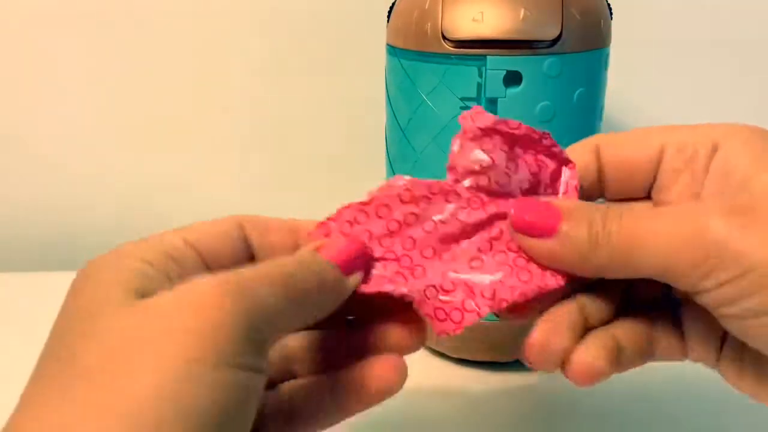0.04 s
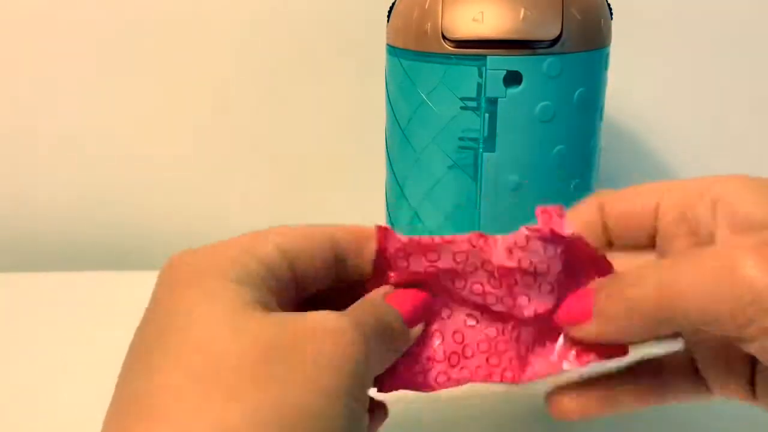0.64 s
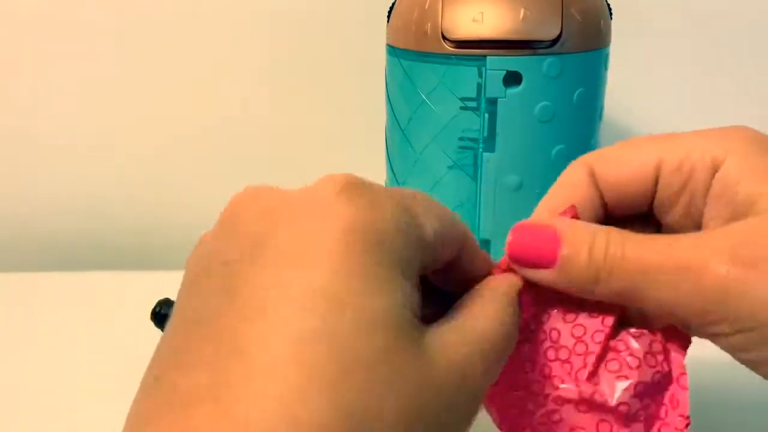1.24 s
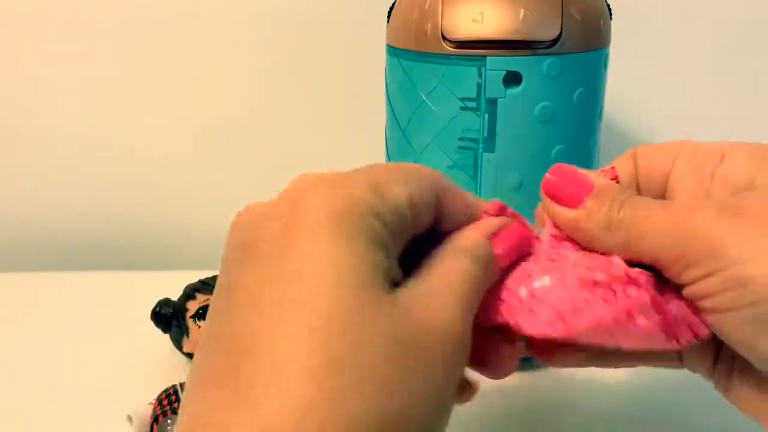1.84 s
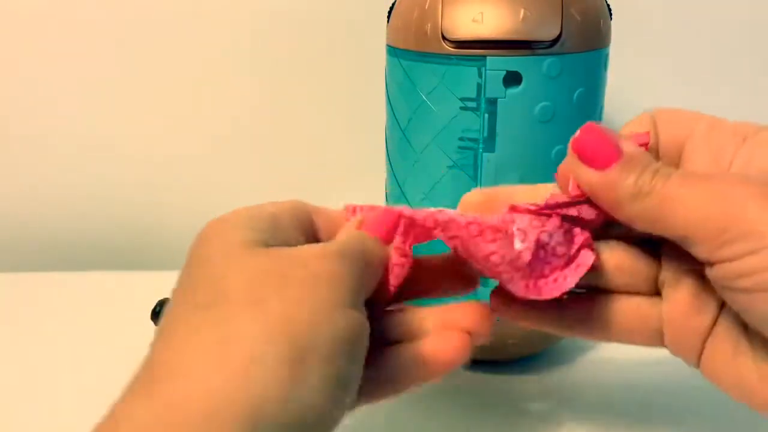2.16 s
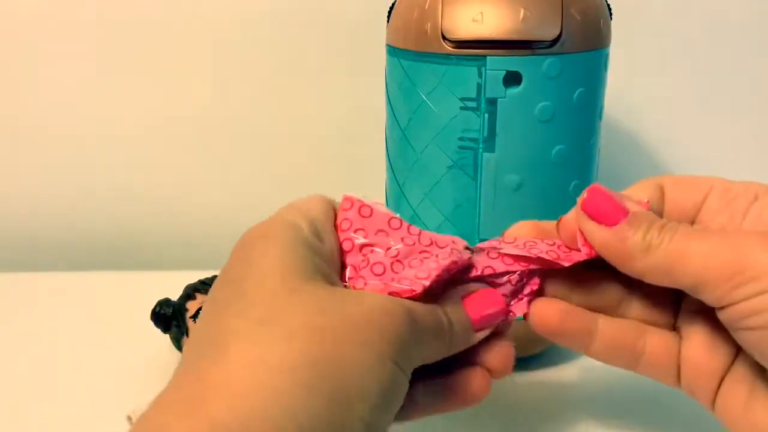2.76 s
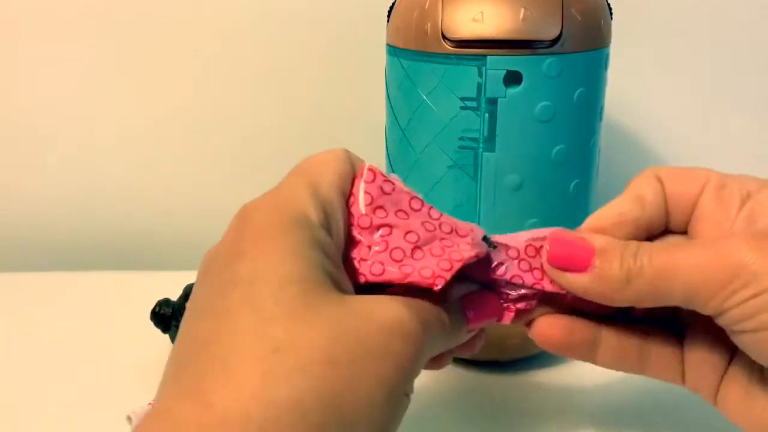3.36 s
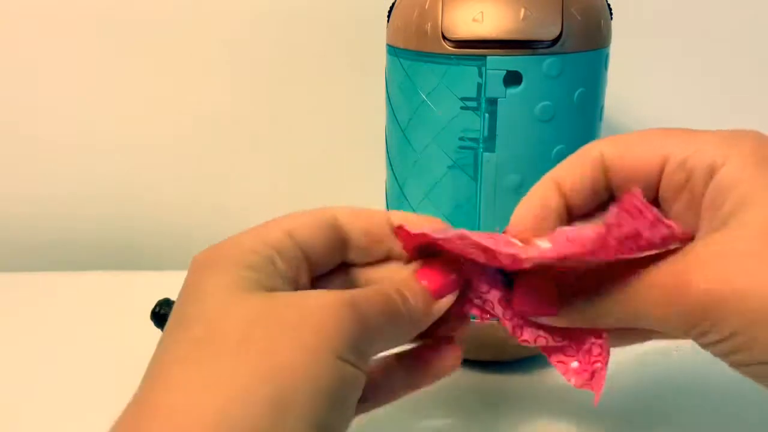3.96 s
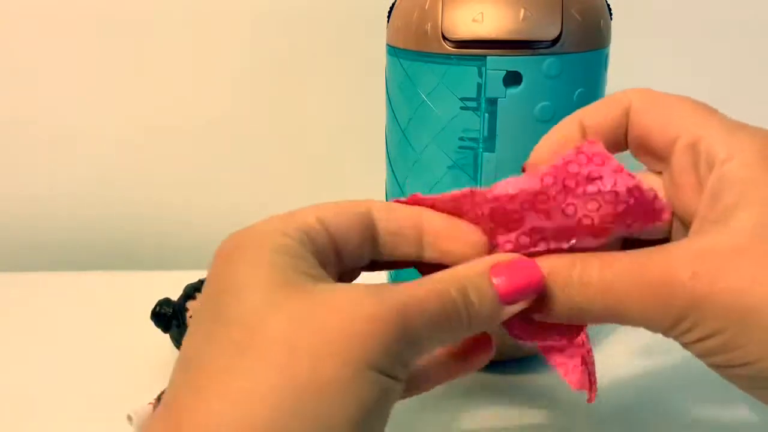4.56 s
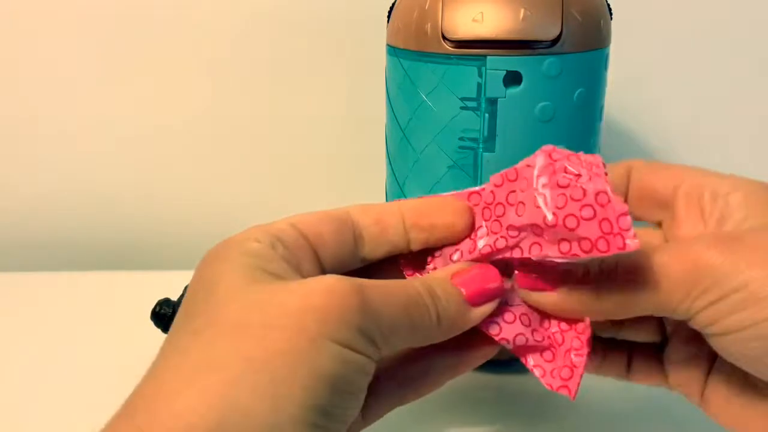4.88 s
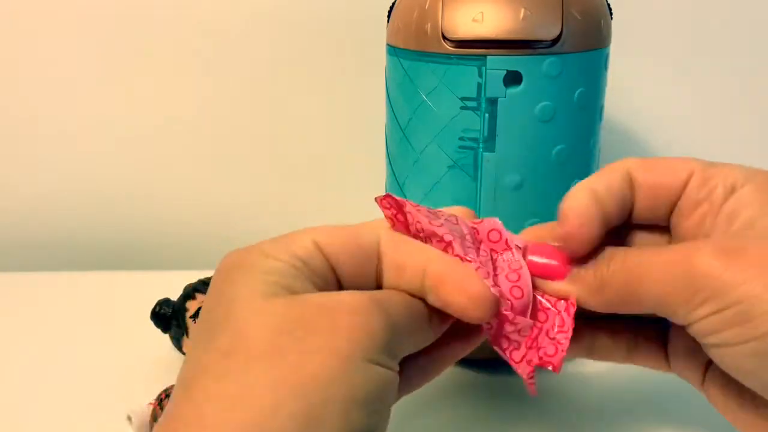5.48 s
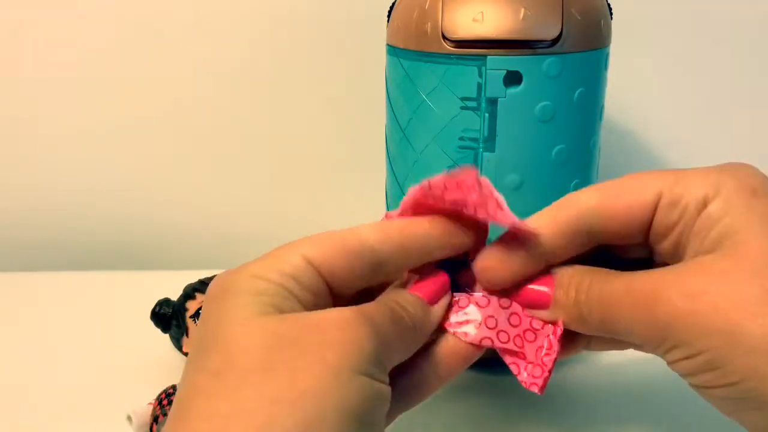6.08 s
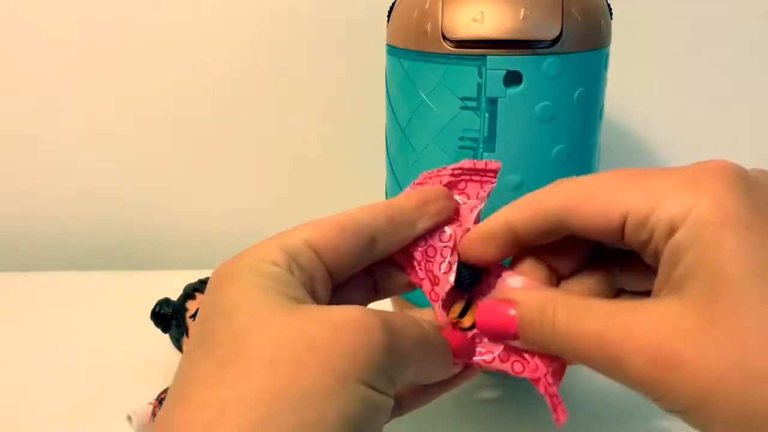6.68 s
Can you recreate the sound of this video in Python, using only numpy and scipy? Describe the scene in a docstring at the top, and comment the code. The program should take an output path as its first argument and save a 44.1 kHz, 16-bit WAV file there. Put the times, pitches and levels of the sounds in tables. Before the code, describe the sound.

Thin plastic crinkles from start to finish as fingers squeeze and tug at a wrapper. Each pull brings a swell of fine crackle and sizzle, dotted with crisp snaps and the occasional papery tap. Skin scuffs the plastic faintly, and a fingertip lands with a soft thump about two thirds of the way through. The sound is close and in stereo, in a small room with a faint low rumble and electrical hum.

```python
"""In a small room, close to a stereo recorder on a table, two hands pull open a crinkly plastic wrapper.
Countless tiny creases crackle under the fingers, film sizzles as it slides on film, and skin scuffs it.
Large creases snap through one by one, and whole panels buckle with a papery tap.
The hands bump softly, a fingertip knocks once, and a faint mains hum and room rumble lie underneath."""
import sys
import numpy as np
from scipy import signal
from scipy.fft import rfft, irfft, next_fast_len
from scipy.io import wavfile
from scipy.ndimage import uniform_filter1d

SR = 44100
rng = np.random.default_rng(int(sys.argv[2]) if len(sys.argv) > 2 else 0)


def inscribe(sig):
    """Save sig as 16-bit PCM at rate SR to the path in sys.argv[1].

    A 1-D sig is mono; a 2-D sig holds one channel per row.
    Samples are clipped to [-1, 1] before scaling.
    """
    pcm = np.round(np.clip(np.atleast_2d(sig).T, -1, 1) * 32767)
    wavfile.write(sys.argv[1], SR, pcm.astype(np.int16))


N = 296799
TIME = np.arange(N) / SR
TOP_HZ = 15800  # the treble is cut above this

# The tone of the room's rumble. Each row: frequency in Hz, relative level in dB.
RUMBLE_TONE = [(30, -13), (55, 3), (80, -11), (160, -10.5), (450, -13), (700, -19.5), (2000, -15),
               (15000, -79)]
# Squeezes and pulls of the fingers. Each row: moment of most strain in seconds, build-up in seconds,
# letting go in seconds, relative level in dB, dullness in dB (higher sounds duller).
SQUEEZES = [(0.03, 0.065, 0.11, -19, -15.5), (0.181, 0.078, 0.057, -28.5, -5.5),
            (0.321, 0.073, 0.079, -39, -4), (.455, 0.037, 0.054, -37, -4),
            (0.563, 0.065, 0.0074, -23.5, -8), (.687, 0.11, 0.013, -30.5, -15.5),
            (.823, 0.11, 0.03, -23.5, -9.5), (.991, 0.022, 0.013, -34, -3), (1.07, 0.03, 0.01, -31.5, -8),
            (1.249, 0.055, 0.013, -36.5, 3), (1.382, 0.022, 0.013, -39, -1.5),
            (1.5, 0.015, 0.029, -34.5, -12), (1.734, 0.036, 0.071, -25, -9),
            (1.877, 0.016, 0.11, -28.5, -2.5), (2.147, 0.12, 0.047, -23.5, -9),
            (2.355, 0.14, 0.045, -26.5, -16), (2.463, 0.12, 0.016, -30, -13.5),
            (2.541, 0.016, 0.025, -33.5, -9), (2.644, 0.035, 0.072, -21.5, -10),
            (2.84, 0.15, 0.19, -24, -15.5), (3.089, 0.022, 0.019, -24.5, -8.5),
            (3.315, 0.1, 0.064, -24, -13), (3.49, 0.14, 0.064, -20.5, -17.5),
            (3.63, 0.13, 0.19, -29, -11.5), (3.949, 0.11, 0.035, -32, -12.5),
            (4.041, 0.047, 0.032, -24, -16), (4.14, 0.023, 0.063, -30, -23),
            (4.244, 0.091, 0.13, -30.5, -13), (4.439, 0.0583, 0.028, -36, -7.5),
            (4.513, 0.032, 0.05, -23.5, -7), (4.635, 0.055, 0.087, -24.5, -9.5),
            (4.98, 0.2, 0.16, -23.5, -17), (5.18, 0.064, 0.083, -24.3, -13.5),
            (5.26, 0.05, 0.087, -25, -7.5), (5.42, 0.042, 0.05, -38, -10), (5.489, 0.077, 0.11, -38, 0),
            (5.766, 0.15, 0.053, -30.5, -7.5), (5.95, 0.066, 0.07, -39.5, -10),
            (6.088, 0.035, 0.094, -25, -9.5), (6.293, 0.12, 0.053, -24, -8),
            (6.459, 0.14, 0.04, -29.5, -6.5), (6.628, 0.062, 0.2, -39, -10)]
# The tone of the plastic film. Each row: frequency in Hz, relative level in dB.
FILM_TONE = [(100, -40.5), (280, -30), (500, -16.5), (700, -18.5), (950, -12.5), (1300, -7), (1800, -12.5),
             (2100, -1), (2700, -4), (3500, -2), (5000, -3), (8000, -2.5), (10000, 0.5), (15000, 0)]
# Fingertips rubbing the film. Each row: start in seconds, end in seconds, level in dB.
RUBS = [(.02, 0.205, -53), (0.734, 0.88, -47), (4.392, 4.943, -55), (5.397, 5.64, -53.5)]
# Large creases snapping through. Each row: time in seconds, relative level in dB, dullness in dB.
SNAPS = [(0.0619, -14.0, -27), (0.2104, -22.0, 0), (0.3112, -19.5, -12), (0.346, -23.5, -17),
         (0.4372, -18.5, -9), (0.4595, -19.0, -12), (0.5121, -19.0, -8), (0.5612, -18.0, -21),
         (0.5686, -14.0, -13), (0.5961, -19.5, -20), (0.6083, -24.0, -15), (0.6758, -18.5, -15),
         (0.6808, -17.0, -21), (0.6875, -16.0, -13), (0.7081, -15.5, -24), (0.746, -21.0, -10),
         (0.7538, -17.0, -10), (0.7951, -15.5, -24), (0.8092, -15.5, 4), (0.8527, -16.0, -8),
         (0.8612, -17.0, -13), (0.9241, -24.5, -8), (0.9293, -19.0, -5), (0.9619, -17.0, -5),
         (0.9853, -22.5, -7), (1.0407, -19.5, -20), (1.0987, -23.5, -3), (1.1439, -26.5, -3),
         (1.1834, -17.0, -3), (1.1862, -14.5, -9), (1.235, -25.5, 8), (1.2485, -19.5, -3),
         (1.2906, -23.0, 8), (1.3101, -26.5, -10), (1.3288, -19.5, -2), (1.356, -26.0, -13),
         (1.4161, -14.0, -17), (1.4483, -24.0, 8), (1.5013, -22.5, -9), (1.5638, -23.0, -23),
         (1.591, -22.0, -19), (1.6705, -22.5, -12), (1.6797, -26.0, -15), (1.6971, -17.5, -1),
         (1.7101, -16.0, -19), (1.7195, -14.0, -26), (1.7226, -16.0, -17), (1.7568, -18.0, -1),
         (1.7749, -19.0, -12), (1.7847, -19.0, 2), (1.809, -23.5, 0), (1.8552, -15.5, -13),
         (1.878, -15.0, -6), (1.9351, -13.5, -23), (1.9542, -22.5, -13), (1.9713, -19.0, -8),
         (1.9846, -20.5, -10), (1.9902, -18.5, -18), (2.038, -17.0, -13), (2.0628, -16.5, -8),
         (2.083, -20.0, 4), (2.0977, -16.0, -13), (2.1361, -17.5, -12), (2.1613, -17.0, -20),
         (2.2085, -17.0, -6), (2.3135, -15.5, -28), (2.3404, -15.0, -10), (2.3664, -17.0, -18),
         (2.5218, -22.5, -15), (2.6369, -16.5, -21), (2.7813, -17.0, -15), (2.8164, -15.5, -17),
         (3.0032, -21.0, -17), (3.0847, -18.5, -18), (3.1153, -14.0, -23), (3.1198, -15.0, -8),
         (3.1512, -16.0, -9), (3.2253, -23.0, -8), (3.3361, -12.5, -14), (3.3614, -18.0, -15),
         (3.3937, -18.0, -28), (3.4074, -16.5, -7), (3.4557, -16.5, -28), (3.5636, -18.5, -28),
         (3.5892, -21.0, -13), (3.6449, -15.5, -12), (3.6873, -14.5, -28), (3.7292, -23.5, -13),
         (3.7383, -13.0, -9), (3.8271, -18.5, -13), (3.8794, -21.0, -6), (3.9234, -18.5, -11),
         (3.9366, -14.5, -28), (3.9786, -14.5, -25), (4.1096, -21.0, -28), (4.1134, -18.5, -12),
         (4.1477, -22.0, -12), (4.2787, -20.0, -17), (4.2836, -16.0, -17), (4.3365, -22.0, -9),
         (4.3931, -16.5, -5), (4.4302, -22.0, -28), (4.4813, -23.5, -11), (4.489, -19.5, -11),
         (4.5038, -14.5, -6), (4.5128, -19.0, 3), (4.5175, -15.0, 8), (4.5663, -16.5, -8),
         (4.595, -12.5, -19), (4.6439, -14.5, -28), (4.6911, -17.5, -11), (4.7744, -18.5, -10),
         (4.791, -18.5, -20), (4.7973, -18.0, -10), (4.8115, -18.5, -8), (4.8279, -15.5, -2),
         (4.8587, -17.0, 0), (4.8893, -17.0, -27), (4.8988, -13.5, -12), (4.911, -19.0, -5),
         (4.935, -17.0, -21), (5.061, -17.0, -9), (5.0666, -17.0, -10), (5.1414, -14.5, -28),
         (5.2088, -12.5, -28), (5.2805, -14.5, -18), (5.2879, -12.5, -20), (5.3062, -19.5, 1),
         (5.3243, -16.0, -7), (5.374, -16.5, -13), (5.4108, -23.0, -23), (5.4606, -26.0, 2),
         (5.5349, -18.0, -4), (5.5501, -24.5, -12), (5.6505, -20.0, -8), (5.6591, -23.5, -5),
         (5.7037, -18.0, -7), (5.736, -18.0, -18), (5.7682, -19.0, -3), (5.7989, -24.0, -2),
         (5.9048, -27.5, 8), (5.9468, -17.5, -14), (6.0684, -17.0, 0), (6.0927, -18.5, -14),
         (6.2195, -16.5, -17), (6.2481, -20.5, 5), (6.2689, -15.0, -11), (6.2786, -16.0, -4),
         (6.2999, -17.0, -10), (6.435, -19.5, -18), (6.5562, -20.5, -2), (6.5779, -21.0, -7),
         (6.6259, -25.0, 3), (6.6358, -21.5, -13), (6.6608, -27.0, -4), (6.698, -16.5, -7)]
# Panels of film buckling. Each row: time in seconds, relative levels in dB of the low and the high ring.
BUCKLES = [(0.129, -59, -29), (0.305, -41, -32.5), (0.568, -40, -29.5), (0.686, -38.5, -35.5),
           (0.779, -50, -33), (0.928, -33, -35), (0.963, -46, -38), (1.076, -46, -35.5),
           (1.187, -37, -29.5), (1.248, -43, -42), (2.099, -40, -32), (2.14, -33, -48), (2.166, -45, -33.5),
           (2.642, -50, -37.5), (2.951, -57, -37.5), (3.12, -31.5, -35), (3.717, -42.5, -51),
           (4.394, -40.5, -29), (4.45, -44, -39), (4.508, -42, -32), (5.464, -41, -37.5),
           (5.537, -38, -29.5), (5.658, -47, -39), (5.77, -39.5, -37), (6.077, -37, -29),
           (6.115, -40.5, -40)]
# The two broad rings of a panel, low then high. Each row: centre in Hz, width in Hz.
PANEL_RINGS = [(510, 440), (1250, 950)]
# The hands shifting their weight. Each row: start in seconds, end in seconds, level in dB.
BUMPS = [(.32, .39, -50.5), (.45, .65, -51.5), (.63, .9, -48), (.98, 1.06, -48.5), (3.28, 3.6, -59),
         (6.16, 6.37, -55.5)]
# How much louder the left microphone is than the right. Each row: frequency in Hz, difference in dB.
MIC_BALANCE = [(200, 0), (430, 3), (850, -2), (1050, 1.5), (1350, -4), (1800, 2.5), (2100, -2), (3200, 5.5),
               (4250, -6), (6000, 2.5), (8500, 0)]
# How far the left microphone lags behind the right. Each row: frequency in Hz, phase in radians.
MIC_LAG = [(250, 0), (900, -5.4), (1200, -3.3), (1500, -2.6), (2000, 1), (2650, 3.3), (3000, 5.1),
           (4700, 16.2), (5500, 18.7), (7300, 28), (10200, 39), (16000, 63)]
# How much that lag varies from crease to crease. Each row: frequency in Hz, spread in radians.
MIC_LAG_SPREAD = [(2500, 0), (3200, .8), (5000, 1.8), (6500, 1.0), (10000, 0)]


def undb(db):
    """Turn decibels into a number to multiply by."""
    return 10 ** (np.asarray(db) / 20)


def unit(x):
    """Scale a sound so that its average strength (rms) is 1."""
    return x / np.sqrt(np.mean(x ** 2))


def tone_db(points, hz):
    """Read a level between (Hz, dB) points, giving every octave equal room."""
    at, db = np.transpose(points)
    return np.interp(np.log(np.maximum(hz, 1)), np.log(at), db)


def shaped(x, gain):
    """Filter a sound: multiply each frequency by gain(hz)."""
    size = next_fast_len(N + SR // 10)
    hz = np.arange(size // 2 + 1) * SR / size
    return irfft(rfft(x, size) * gain(hz), size)[..., :N]


def add(track, start_s, sound):
    """Mix a short sound into a track."""
    i = int(np.clip(start_s * SR, 0, N - 1))
    track[..., i:i + sound.shape[-1]] += sound[..., :N - i]


def room_tone(rumble_db=-60.0, hum_hz=120, hum_db=-67):
    """The room rumbles steadily, nearly alike in both ears, and the mains hums."""
    noise = rng.standard_normal(N) + 0.24 * rng.standard_normal((2, N))
    rumble = unit(shaped(noise, lambda hz: undb(tone_db(RUMBLE_TONE, hz))))
    hum = unit(np.sin(2 * np.pi * hum_hz * TIME))
    return rumble * undb(rumble_db) + hum * undb(hum_db)


def squeezes(rest_db=-48, rest_dull_db=1, fall_db=9.5):
    """Each squeeze strains the film and lets go. Gives how hard it is worked and its dullness, in dB."""
    power = np.full(N, undb(rest_db) ** 2)  # even film that is only held crackles a little
    dullness = power * rest_dull_db
    for peak_s, build_s, release_s, db, dull_db in SQUEEZES:
        away = np.maximum((peak_s - TIME) / build_s, (TIME - peak_s) / release_s)
        near = away < 5
        strain = undb(db - fall_db * away[near] ** 1.3) ** 2  # 1.3 rounds the peak a little
        power[near] += strain
        dullness[near] += strain * dull_db
    return 10 * np.log10(power), dullness / power


def slackness(dull_db, turn_db=-10, width_db=3):
    """How slack the film is: from 0 when taut and bright up to 2/3 when slack and dull."""
    return 1 / (1.5 + np.exp((turn_db - dull_db) / width_db))


def crease_ticks(dull_db, decay_ms, facet_db, hollow=0, rise_ms=0.15, apart=0.22, size=256):
    """One stereo tick per crease: a kick and a brief flutter ring a facet, a small flat patch of film."""
    count = len(dull_db)
    hz = np.arange(size // 2 + 1) * SR / size
    noise = rng.standard_normal((count, 4, size))
    # the flutter builds up to the kick and dies away, a little differently towards each microphone
    kick = size // 16
    ms = (np.arange(size) - kick) * 1000 / SR
    envelope = np.exp(np.minimum(ms / rise_ms, -ms / decay_ms))
    flutter = (noise[:, :1] + apart * noise[:, 1:3]) * envelope
    flutter[:, :, kick] += 2.5
    # every facet rings at frequencies of its own
    facet = unit(uniform_filter1d(uniform_filter1d(noise[:, 3], size=9), size=5))[:, :len(hz)]
    # wide, slack facets sound low; small, taut ones sound high
    body = tone_db([(500, 0.58), (2000, 0.93), (3300, 0.59), (12000, 0.019)], hz)
    db = tone_db(FILM_TONE, hz) + np.outer(dull_db + 4.5, body) + facet_db * facet - 20 * (hz > TOP_HZ)
    # large creases in slack film add a hollow ring
    ring_hz = 3350 + 200 * rng.standard_normal((count, 1))
    db += hollow * slackness(dull_db)[:, None] ** 2 * np.exp(-((hz - ring_hz) / 500) ** 2)
    # put all the ringing after the kick (a minimum-phase filter)
    cepstrum = irfft(np.log(undb(db)))
    cepstrum[:, 1:size // 2] *= 2
    cepstrum[:, size // 2 + 1:] = 0
    lag = rng.standard_normal((count, 1, 1)) * np.interp(hz, *np.transpose(MIC_LAG_SPREAD))
    ringing = np.exp(rfft(cepstrum)[:, None] + 1j * lag * np.array([[.5], [-.5]]))
    ticks = irfft(ringing * rfft(flutter))
    return ticks / np.sqrt(np.sum(ticks ** 2, axis=(1, 2), keepdims=True) / 2)


def crackle(work_db, dull_db, growth=0.7, scatter_db=7.5, gain_db=2.5):
    """Tiny creases give way at random, more often the harder the film is worked."""
    per_second = 480 * undb(growth * (work_db + 30))
    starts = np.flatnonzero(rng.random(N) < per_second / SR)
    chance = rng.standard_normal((len(starts), 2))
    gains = undb(scatter_db * np.minimum(chance[:, 0], 2))
    ticks = crease_ticks(dull_db[starts] + 1.3 * chance[:, 1], decay_ms=0.56, facet_db=4.0)
    out = np.zeros((2, N))
    for i, gain, tick in zip(starts, gains, ticks):
        add(out, i / SR, gain * tick)
    # neighbouring creases share the strain that the fingers put in
    power = uniform_filter1d(uniform_filter1d(np.mean(out ** 2, axis=0), size=2400), size=1500)
    return out / np.sqrt(power + 0.0049 * np.mean(power)) * undb(work_db + gain_db)


def sliding(work_db, dull_db, gain_db=-1.5, apart=0.48, rough_db=2.7):
    """Film slides on film with a fine, grainy sizzle; slack film hisses lower."""
    noise = rng.standard_normal(N) + apart * rng.standard_normal((2, N))
    hiss = unit(shaped(noise, lambda hz: undb(tone_db(FILM_TONE, hz))))
    low = shaped(hiss, lambda hz: 1 / (1 + (hz / 5500) ** 4))
    low_gain = undb(dull_db + 11.0)
    hiss = (hiss + low * (low_gain - 1)) / np.sqrt(1 + np.var(low) * low_gain ** 2)
    grain = unit(uniform_filter1d(rng.standard_normal(N), size=60))
    return hiss * undb(work_db + gain_db + rough_db * grain)


def hand_pressure(rows):
    """A hand presses and eases off: one smooth swell for each row."""
    return sum(undb(db) * np.sin(np.pi * np.clip((TIME - start) / (end - start), 0, 1))
               for start, end, db in rows)


def rubs(band_hz=(330, 1300), rough_db=0.5):
    """Skin drags over the film in uneven slips and sets the panels scuffing."""
    slips = undb(rough_db * unit(uniform_filter1d(rng.standard_normal(N), size=500)))
    band = signal.butter(2, band_hz, "band", fs=SR, output="sos")
    scuff = signal.sosfilt(band, slips * rng.standard_normal(N))
    return hand_pressure(RUBS) * unit(scuff)


def snaps(gain_db=20.0, before_db=-16, before_s=0.0013, after_db=-12, after_s=0.0012):
    """Large creases flip over with a sharp, dry tick, tripping small neighbours just before and after."""
    starts, db, dull_db = np.transpose(SNAPS)
    out = np.zeros((2, N))
    ticks = crease_ticks(dull_db, decay_ms=0.34, facet_db=3.5, hollow=6)
    for start, gain, tick in zip(starts, undb(db + gain_db), ticks):
        add(out, start, gain * tick)
    for neighbour_db, mean_lag_s in ((before_db, -before_s), (after_db, after_s)):
        lags = mean_lag_s * rng.gamma(2, .5, size=len(starts))
        ticks = crease_ticks(dull_db, decay_ms=0.49, facet_db=4.0)
        for start, gain, tick in zip(starts + lags, undb(db + gain_db + neighbour_db), ticks):
            add(out, start, gain * tick)
    return out


def buckles(swell_s=0.0029, gain_db=-14.5, spread_octaves=0.064):
    """A whole panel rolls through with a soft, papery tap; no two panels are the same size."""
    out, t = np.zeros(N), TIME[:SR // 10]
    for start, *levels in BUCKLES:
        for (hz, width), db in zip(PANEL_RINGS, levels):
            detune = 2 ** (spread_octaves * np.tanh(rng.standard_normal()))
            edges_hz = np.array([hz - width / 2, hz + width / 2]) * detune
            push = rng.standard_normal(len(t)) * t * np.exp(-t / swell_s)
            knock = signal.sosfilt(signal.butter(2, edges_hz, "band", fs=SR, output="sos"), push)
            add(out, start - .002, unit(knock) * undb(db + gain_db))
    return out


def bumps(cutoff_hz=70):
    """The shifting hands send low swells of rumble through the table."""
    rumble = signal.sosfilt(signal.butter(2, cutoff_hz, fs=SR, output="sos"), rng.standard_normal(N))
    return hand_pressure(BUMPS) * unit(rumble)


def finger_tap(start_s=4.454, hz=160, db=-39, decay_s=0.0047):
    """The soft pad of a finger lands on the fold with a low thump of a cycle or two."""
    t = np.maximum(TIME - start_s, 0)
    return np.sin(2 * np.pi * hz * t) * np.exp(-t / decay_s) * undb(db)


def microphones(x):
    """The wrapper is nearer the right microphone, and each one favours its own frequencies."""
    def left_gain(hz):
        lag = np.interp(hz, *np.transpose(MIC_LAG))
        return undb(tone_db(MIC_BALANCE, hz) / 2) * np.exp(-1j * lag)

    right = shaped(x[1], lambda hz: undb(-tone_db(MIC_BALANCE, hz) / 2))
    return np.array([shaped(x[0], left_gain), right])


def wide_patch(x):
    """Sound from a wide patch: the microphones' sum and difference each get a share, hollowed by lag."""
    mid, side = microphones([x[0], x[0]]), microphones([x[1], x[1]])
    return (mid[0] + mid[1]) / 2 + (side[0] - side[1]) / 2 * np.array([[1], [-1]])


def echoes(x, early_db=-7.5, early_s=0.0052, tail_db=-17.5, fade_s=0.49, cutoff_hz=7500, block=2048):
    """The moving hands scatter the sound in ever-changing ways; the walls add a short, dull tail."""
    dulled = signal.sosfilt(signal.butter(2, cutoff_hz, fs=SR, output="sos"), x)
    t = TIME[:SR // 2]
    fade = np.exp(-np.log(1000) * t / fade_s)  # down 60 dB after fade_s
    tail = rng.standard_normal((2, len(t))) * fade * (t > .009)
    out = signal.fftconvolve(dulled, unit(tail) * undb(tail_db) / np.sqrt(len(t)), axes=1)[:, :N]
    t = TIME[:block]
    for i in range(0, N, block):
        scatter = rng.standard_normal((2, block)) * np.exp(-t / early_s) * (t > .001)
        early = unit(scatter) * undb(early_db) / np.sqrt(block)
        add(out, i / SR, signal.fftconvolve(dulled[:, i:i + block], early, axes=1))
    return out


def scene():
    """Mix the wrapper, its echoes, the hands and the quiet background."""
    work_db, dull_db = squeezes()
    # taut, bright film mostly slides; the slacker it is, the more it crumples instead
    slide_share = 0.78 - 0.53 * slackness(dull_db)
    sizzle = np.sqrt(slide_share) * sliding(work_db, dull_db)
    crinkle = snaps() + np.sqrt(1 - slide_share) * crackle(work_db, dull_db) + buckles() + rubs()
    wrapper = microphones(crinkle) + wide_patch(sizzle) + echoes(crinkle)
    return wrapper + bumps() + finger_tap() + room_tone()


def record(dry):
    """The recorder rounds the loudest peaks and cuts the highest treble."""
    return signal.sosfilt(signal.ellip(8, .2, 70, TOP_HZ, fs=SR, output="sos"), np.tanh(dry))


dry = scene()
out = record(dry)
inscribe(out)
```